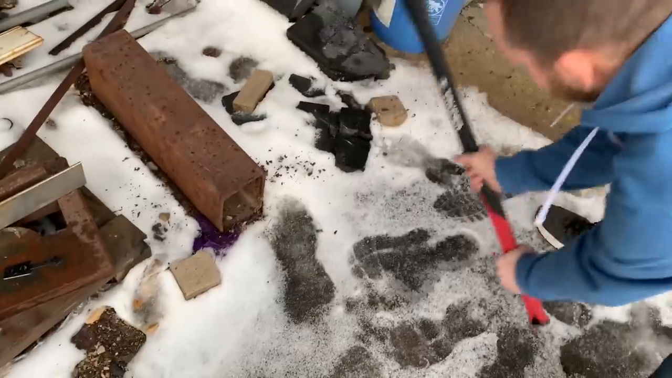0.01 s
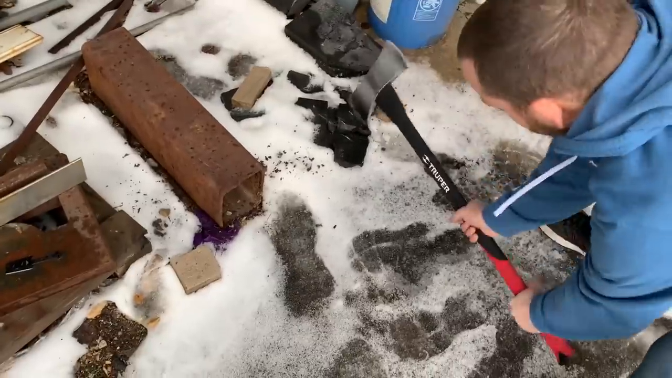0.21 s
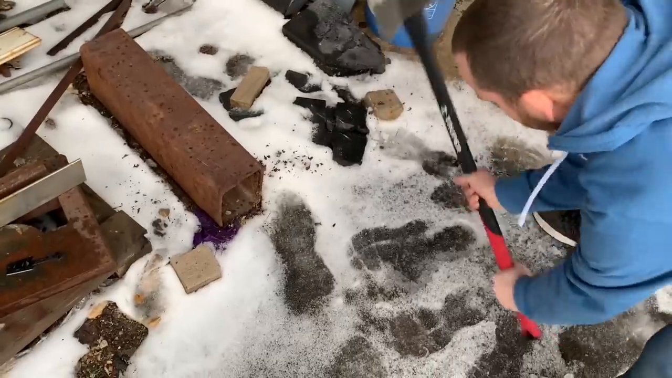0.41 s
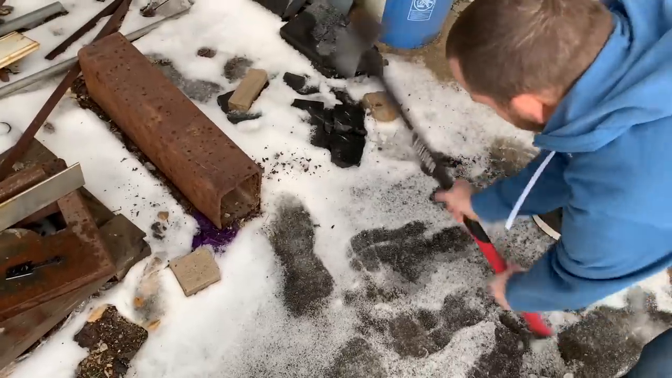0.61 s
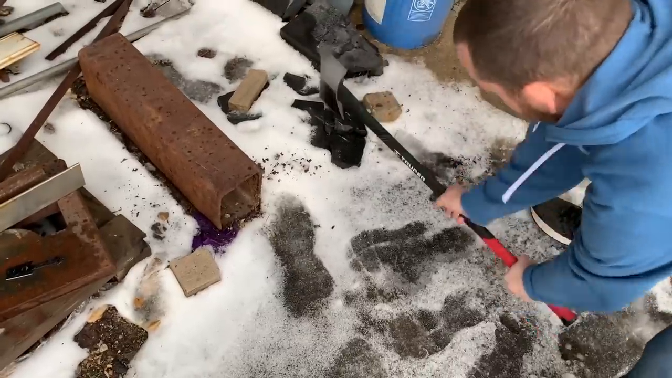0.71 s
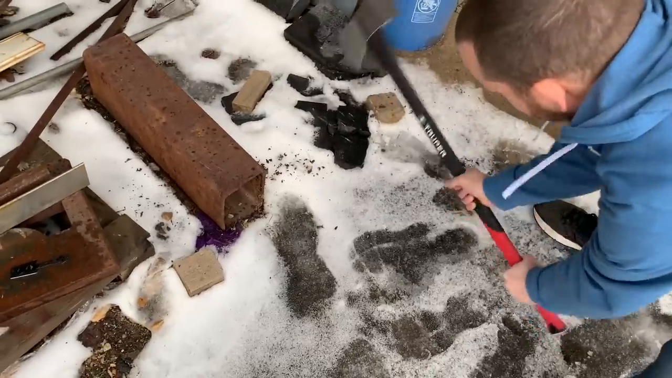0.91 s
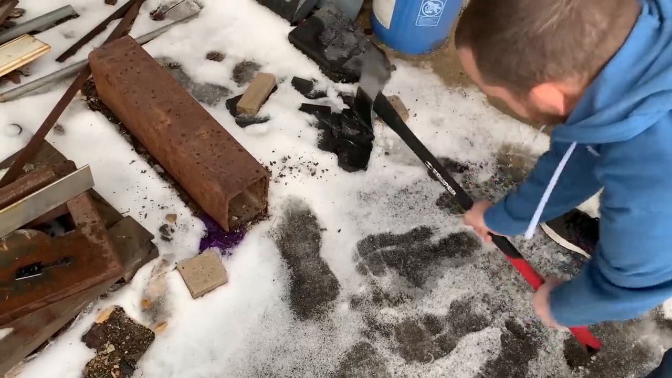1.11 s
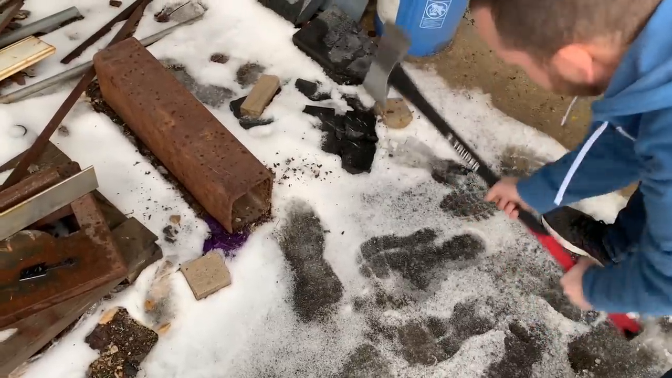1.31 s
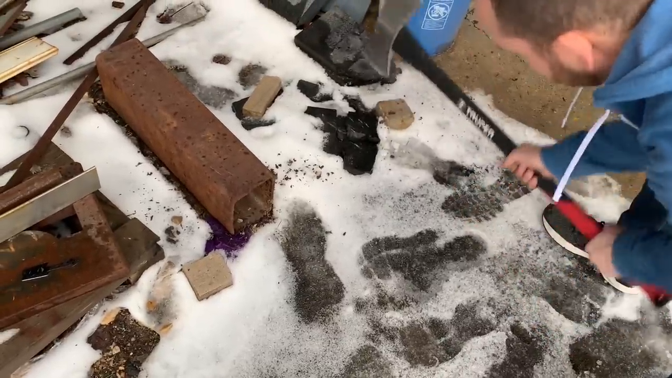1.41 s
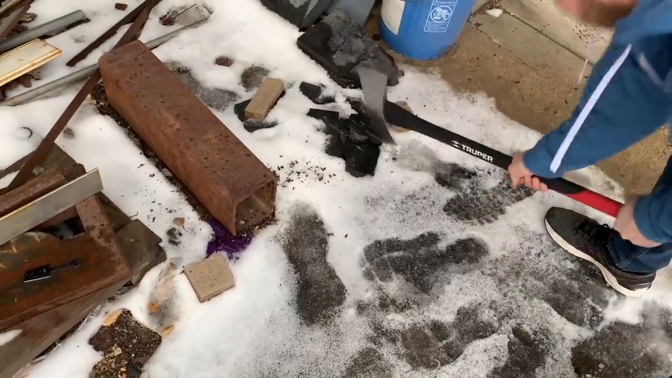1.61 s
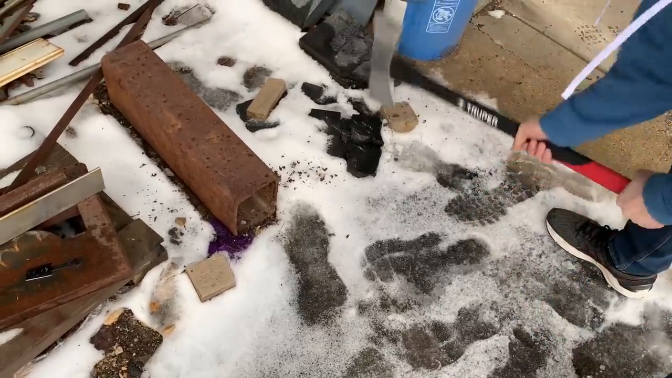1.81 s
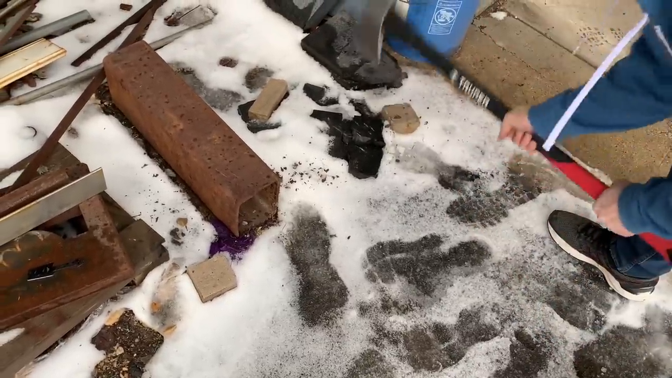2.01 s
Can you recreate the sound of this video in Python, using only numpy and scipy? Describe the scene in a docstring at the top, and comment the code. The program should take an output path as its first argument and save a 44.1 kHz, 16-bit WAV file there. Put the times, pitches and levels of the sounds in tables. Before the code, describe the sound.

A steel axe chops a hard rock four times, sharp gritty cracks with short metallic rings outdoors

```python
"""A steel axe chops four times at a rock in a snowy yard, close by.
A low outdoor rumble, shaped noise with a faint hum, lies underneath; a tick of grit comes first.
Each blow is then a gritty crack (noise bursts), a thud of rock and haft and a ring of the blade
(decaying modes); walls slap it back, a short tail follows and the ground rumbles (shaped noise).
Uneven noise scuffs icy grit twice before the second blow; faint ticks precede the third and fourth."""
import sys
import numpy as np
from scipy import signal
from scipy.fft import rfft, irfft
from scipy.io import wavfile

SR = 44100
rng = np.random.default_rng(int(sys.argv[2]) if len(sys.argv) > 2 else 0)


def materialize(psi):
    """Save the field psi as 16-bit PCM at rate SR to the path in sys.argv[1].

    A 1-D psi becomes a single channel; in a 2-D psi each row is a channel.
    """
    bounded = np.clip(np.atleast_2d(psi).T, -1, 1)
    quanta = np.round(bounded * 32767).astype(np.int16)
    wavfile.write(sys.argv[1], SR, quanta)


N = 90405
TIME = np.arange(N) / SR


def from_db(db):
    """Level to amplitude: 20 dB is a factor of ten."""
    return 10 ** (np.asarray(db) / 20)


def rms_one(x):
    """Normalise the mean power to one."""
    return x / np.sqrt(np.mean(x ** 2) + 1e-20)


def at_hz(points, hz):
    """Interpolate a table along logarithmic frequency."""
    f, v = np.transpose(points)
    return np.interp(np.log(hz), np.log(f), v)


def bins(x):
    """Discrete Fourier frequencies of a signal, held at 1 Hz or above."""
    return np.maximum(np.fft.rfftfreq(x.shape[-1], 1 / SR), 1)


def colour(x, db):
    """Linear filtering: each frequency receives its own gain."""
    return irfft(rfft(x) * from_db(db), x.shape[-1])


def low_pass_db(ratio):
    """First-order roll-off: 3 dB down where frequency / corner is one."""
    return -10 * np.log10(1 + ratio ** 2)


def decay(t, t60):
    """Exponential decay: the amplitude falls by 60 dB in t60."""
    return np.exp(-np.log(1000) * t / t60)


def spread(pair, likeness):
    """Interchannel coherence: shared and opposed parts of two unrelated signals set the likeness."""
    c = np.clip(likeness, -.99, .99)
    mid, side = rfft(pair)
    shared = np.sqrt((1 + c) / 2) * mid
    opposed = np.sqrt((1 - c) / 2) * side
    return irfft(shared + opposed * [[1], [-1]], pair.shape[-1])


# coherence of left and right in a diffuse field: (f/Hz, likeness)
LIKENESS = [(60, 1), (140, .9), (300, 0.78), (640, 0.45), (1400, 0.15), (10000, 0.044)]


def diffuse_noise():
    """Diffuse field: white noise, alike in the bass and nearly unrelated in the treble."""
    return spread(rng.standard_normal((2, N)), at_hz(LIKENESS, bins(TIME)))


def burst(s, rise, fall, count=3):
    """Impulsive noise: a short stereo burst of unit energy, its spectrum repeatedly evened."""
    t = TIME - s
    shape = np.exp(np.minimum(t / rise, -t / fall).clip(-60, 0))
    x = rng.standard_normal((2, N)) * shape
    for _ in range(count):
        even = irfft(np.exp(1j * np.angle(rfft(x))), N)
        x = even * shape ** .25  # gather it again around its moment
    return rms_one(x) / np.sqrt(N)


CRACK_LIKENESS = 0.57  # least likeness of left and right for near sounds
PORT_LAG_S = 4.5e-5  # near sounds reach the left microphone first
# interchannel level difference of near sounds: (f/Hz, left minus right level/dB)
NEAR_PAN = [(200, -31), (500, 18), (1100, -1), (2300, 3), (4500, -7), (12000, 3)]


def near(pair):
    """Interchannel cues: level and time differences place a near sound, slightly early on the left."""
    hz = bins(TIME)
    pair = spread(pair, np.maximum(CRACK_LIKENESS, at_hz(LIKENESS, hz)))
    half_level = np.log(from_db(at_hz(NEAR_PAN, hz))) / 2
    half_lag = 1j * np.pi * hz * PORT_LAG_S
    return irfft(rfft(pair) * np.exp((half_level + half_lag) * [[1], [-1]]), N)


AIR_DB = -42.5  # rms level
# spectrum of the outdoor rumble, relative: (f/Hz, level per Hz/dB)
AIR = [(20, -4), (45, -7.5), (95, -4.5), (130, -9), (200, -16.5), (500, -26), (900, -24), (1300, -31.5),
       (2600, -34.5), (3700, -41.5), (5000, -44), (9000, -55), (15000, -69)]
# sinusoids of the faint distant hum: (f/Hz, level/dB)
HUM = [(92, -55), (904, -65)]


def background():
    """Stationary noise: a low outdoor rumble, with steady sinusoids as a faint hum."""
    air = from_db(AIR_DB) * rms_one(colour(diffuse_noise(), at_hz(AIR, bins(TIME))))
    hum = sum(from_db(db) * np.sin(2 * np.pi * (hz * TIME + rng.random())) for hz, db in HUM)
    return air + hum


TICK_FALL_S = 0.0029  # nominal, before the burst is evened
TICK_SLOPE_DB = 9  # per octave away from the pitch
# small ticks of grit: (t/s, level/dB, pitch f/Hz)
TICKS = [(0.1203, -2, 1280), (1.147, -27, 2400), (1.624, -34.5, 9000)]


def ticks():
    """Band-limited impulses: tiny knocks, each strongest around its own pitch."""
    hz, out = bins(TIME), 0
    for s, db, pitch in TICKS:
        peak_db = db - TICK_SLOPE_DB * abs(np.log2(hz / pitch))
        out = out + colour(burst(s, TICK_FALL_S / 2, TICK_FALL_S), peak_db)
    return near(out)


DULL_RISE_S, DULL_FALL_S, DULL_HZ = 0.00497, 0.00248, 7500  # the duller burst of the crack, nominal
SNAP_DB, SNAP_S = -1.5, 0.0007


def crack_bursts(s):
    """Superposed impulsive noise: a duller, longer burst and a brief bright snap make the crack."""
    roll_off_db = low_pass_db((bins(TIME) / DULL_HZ) ** 2)
    dull = colour(burst(s, DULL_RISE_S, DULL_FALL_S), roll_off_db)
    return dull + from_db(SNAP_DB) * burst(s, SNAP_S, 2 * SNAP_S)


def ring(modes, s):
    """Modal superposition: decaying sinusoids struck at time s, their strengths varying a little."""
    t, out = np.maximum(TIME - s, 0), 0
    for hz, db, t60 in modes:
        strength_db = db + .5 * rng.normal()
        out = out + from_db(strength_db - 60 * t / t60) * np.sin(2 * np.pi * hz * t)
    return out


# mode frequencies of the rock's knock: (f/Hz)
KNOCK_HZ = [545, 658, 1098]
# strength of those modes: (level/dB, t60/s)
KNOCK_MODES = [(-17.5, 0.035), (-22.5, 0.098), (-29.5, 0.022)]


def knock(s):
    """Modal response of the rock: a few short middle-frequency modes."""
    return ring(np.column_stack([KNOCK_HZ, KNOCK_MODES]), s)


# low modes of haft and ground: (f/Hz, t60/s)
THUMP_MODES = [(93, .3), (150, .22), (192, .2), (262, .1)]
# level of each of those modes: (level/dB)
THUMP_LEVELS_DB = [-30.5, -39.5, -35, -22.5]


def thump(s):
    """Low-frequency modal response of haft and ground, nearly alike in every blow."""
    return ring([(hz, db, t60) for (hz, t60), db in zip(THUMP_MODES, THUMP_LEVELS_DB)], s)


BLADE_BLUR = .002  # width of each mode as a share of its frequency
# modes of the steel head: (f/Hz, t60/s)
BLADE_MODES = [(1835, .3), (2022, .2), (2615, .2), (2781, .32), (2842, .3), (3012, .18), (4655, .4),
               (5190, .18), (6245, .4), (6335, .2), (9700, .12), (10590, .1)]
# level of each of those modes: (level/dB)
BLADE_LEVELS_DB = [-42.5, -40.5, -26.5, -27.5, -40.5, -41, -39, -47.5, -35, -44.5, -52, -40]


def blade(s, tilt_db):
    """Modes with phase diffusion: the steel rings unsteadily, out of step at the two microphones."""
    t, out = np.maximum(TIME - s, 0), 0
    middle_hz = np.median([hz for hz, _ in BLADE_MODES])
    for (hz, t60), db in zip(BLADE_MODES, BLADE_LEVELS_DB):
        strength_db = db + tilt_db * np.log2(hz / middle_hz) + rng.normal()
        level = from_db(strength_db) * decay(t, t60)
        wander = np.cumsum(rng.standard_normal(N)) * np.sqrt(2 * np.pi * BLADE_BLUR * hz / SR)
        offset = rng.uniform(-1, 1) * np.array([[1], [-1]])
        out = out + level * np.sin(2 * np.pi * hz * t + wander + offset)
    return out * (TIME > s)


CRACK_DB, THUD_LAG_S, BLADE_DIRECT_DB = 12.5, 0.00149, -2
CLINK_OCTAVES = 0.054  # distance from the pitch at which a clink's dB are halved
CRACK_SEND_DB, CLINK_SEND_SHARE, SEND_DULL_HZ = 2.5, 0.62, 11000  # the crack sent into the yard
BLADE_SEND_DB, BODY_SEND_DB = -1, -9
# blows: (t/s, crack level/dB, knock level/dB, blade level/dB, blade tilt/dB per octave, yard level/dB)
BLOWS = [(0.2095, 2.5, -6, 3.5, -5, 0), (0.738, 1.5, 3.5, -5, 6.5, 1), (1.1957, 0.5, 3, -3, 7, 0.5),
         (1.6675, 5.5, 4, -8.5, -0.5, -4)]
# frequencies at which the crack varies from blow to blow: (f/Hz)
TONE_HZ = [600, 1200, 2200, 4800, 10000]
# the edge meets the rock differently, one row a blow: (level/dB at each of TONE_HZ)
BLOW_TONES = [(-14.5, -4.5, 5, -5, 1), (1, -2, -2.5, 5, 0.61), (-4.5, -3.5, 1.5, 3, 0.87),
              (1.5, -4, -3, 2, -2.7)]
# spectrum of the crack, relative: (f/Hz, level per Hz/dB)
CRACK = [(60, -12), (200, -3), (600, -0.5), (1400, 4.5), (2200, 2), (3200, 3), (4100, -5), (6200, -6),
         (7600, -6), (9600, 0.5), (11000, -10), (12300, -11), (14500, -5), (16000, -57)]
# short clinks of the stone, two a blow: (f/Hz, level/dB, f/Hz, level/dB)
CLINKS = [(2630, 14.5, 6560, 17.5), (1050, 9.5, 6050, 8.5), (1920, 7, 6530, 17), (2327, 8.5, 5000, 2.5)]


def axe():
    """Impact excitation: the blows as heard directly, and what they send into the yard."""
    cracks, rings, sent, hz = 0, 0, 0, bins(TIME)
    for blow, tone, clinks in zip(BLOWS, BLOW_TONES, CLINKS):
        s, crack_db, knock_db, ring_db, tilt_db, yard_db = blow
        clink_db = 0
        for pitch, peak_db in zip(clinks[::2], clinks[1::2]):
            clink_db = clink_db + peak_db / (1 + (np.log2(hz / pitch) / CLINK_OCTAVES) ** 2)
        stone_db = crack_db + CRACK_DB + at_hz(CRACK, hz) + at_hz(list(zip(TONE_HZ, tone)), hz)
        body = from_db(knock_db) * knock(s + THUD_LAG_S) + thump(s + THUD_LAG_S)
        steel = from_db(ring_db) * blade(s, tilt_db)
        cracks = cracks + colour(crack_bursts(s), stone_db + clink_db)
        rings = rings + body + from_db(BLADE_DIRECT_DB) * steel
        # the yard receives a brief, duller crack with weaker clinks
        send_db = CRACK_SEND_DB + stone_db + CLINK_SEND_SHARE * clink_db
        send_db = send_db + low_pass_db(hz / SEND_DULL_HZ)
        crack_send = colour(burst(s, SNAP_S, 2 * SNAP_S, count=5)[0], send_db)
        thud_and_ring = from_db(BODY_SEND_DB) * body + from_db(BLADE_SEND_DB) * steel[0]
        sent = sent + from_db(yard_db) * (crack_send + thud_and_ring)
    return near(cracks) + rings, sent


ECHO_DULL_HZ = 6000
SLAP_S, SLAP_WIDTH_S, SLAP_DB = 0.026, .0045, -32.5
TAIL_START_S, TAIL_DB = 0.014, -33.5
EARLY_SCATTER_DB = -13  # of the tail before its start
# nominal delays of the wall echoes: (t/s)
ECHO_S = [.0175, .0235, .0265, .049, .072]
# those echoes before the yard's colour: (level/dB, left minus right level/dB)
ECHOES = [(-17.5, -9), (-8, 0.34), (-17.5, 4.8), (-26.5, 6), (-19, 6.8)]
# gain of the whole yard response: (f/Hz, level/dB)
YARD_COLOUR = [(80, 6.5), (250, 6.5), (600, 5), (1200, 5.5), (2500, 1.5), (5000, 5), (7500, -4), (10000, 3),
               (12000, -14), (15000, 2)]
# reverberation time of the tail: (f/Hz, t60/s)
YARD_T60 = [(80, 0.76), (300, 0.62), (1000, 0.48), (2500, .52), (5000, .44), (9000, 0.34), (14000, 0.41)]


def yard_response():
    """Impulse response: wall echoes, a scattered slap and a tail whose decay depends on frequency."""
    hz = bins(TIME)
    slap_shape = np.exp(-.5 * ((TIME - SLAP_S) / SLAP_WIDTH_S) ** 2)
    out = diffuse_noise() * from_db(SLAP_DB) * slap_shape
    opening = np.where(TIME < TAIL_START_S, from_db(EARLY_SCATTER_DB), 1)
    tail = rfft(diffuse_noise())
    centres = np.geomspace(60, 15000, 12)  # overlapping bands, each with its own decay
    for centre, band in zip(centres, np.eye(len(centres))):
        band_noise = irfft(tail * np.interp(np.log(hz), np.log(centres), band), N)
        out += band_noise * from_db(TAIL_DB) * opening * decay(TIME, at_hz(YARD_T60, centre))
    echoes = np.zeros((2, N))
    for s, (db, pan_db) in zip(ECHO_S, ECHOES):
        for side, sign in enumerate((1, -1)):
            arrival = int(s * SR) + rng.integers(0, 10)  # up to nine samples late
            echoes[side, arrival] += from_db(db + sign * pan_db / 2)
    out += colour(echoes, low_pass_db(hz / ECHO_DULL_HZ))
    return colour(out, at_hz(YARD_COLOUR, hz))


RUMBLE_DB, RUMBLE_HZ, RUMBLE_RISE_S, RUMBLE_T60 = -22.5, 150, 0.0089, 0.51
RUMBLE_SLOPE_DB = 2  # times the square of the octaves from RUMBLE_HZ


def ground():
    """Build-up and decay: low noise swells and dies after each blow."""
    level = 0
    for blow in BLOWS:
        age = np.maximum(TIME - blow[0], 0)
        level = level + (1 - np.exp(-age / RUMBLE_RISE_S)) * decay(age, RUMBLE_T60)
    low_db = -RUMBLE_SLOPE_DB * np.log2(bins(TIME) / RUMBLE_HZ) ** 2
    return from_db(RUMBLE_DB) * level * rms_one(colour(diffuse_noise(), low_db))


SCUFF_CATCH_S, SCUFF_CATCH_DB = .0015, 3  # spacing and spread of the catches
SCUFF_GRAIN_DB, SCUFF_EDGE_S = 5, .003
# scuffs: (start t/s, length t/s, level/dB, tilt/dB per octave)
SCUFFS = [(0.562, .02, -35, 0), (0.639, .039, -35.5, 2.5)]
# spectrum of a scuff, relative: (f/Hz, level/dB)
SCUFF = [(200, -11), (900, -17.5), (1500, -5.5), (2200, -8.5), (3300, -6.5), (5500, -14.5), (7200, -13),
         (9000, -4), (11500, -16), (14000, -8.5), (16000, -32)]


def scuffs():
    """Sliding friction: short gritty noise that catches unevenly and fades quickly."""
    out, hz, catches = 0, bins(TIME), np.arange(0, N / SR, SCUFF_CATCH_S)
    for s, length, db, tilt_db in SCUFFS:
        grip_db = SCUFF_CATCH_DB * np.interp(TIME, catches, rng.standard_normal(len(catches)))
        grain_db = SCUFF_GRAIN_DB * rng.standard_normal(N)
        grit = rng.standard_normal((2, N)) * from_db(grip_db + grain_db)
        slide = rms_one(colour(grit, at_hz(SCUFF, hz) + tilt_db * np.log2(hz)))
        outside = np.maximum(np.maximum(s - TIME, TIME - s - length), 0)
        out = out + from_db(db) * np.exp(-outside / SCUFF_EDGE_S) * slide
    return near(out)


TICK_YARD_DB, SCUFF_YARD_DB = -14, -8.5


def scene():
    """Superposition: direct sounds, their convolution with the yard, and the background."""
    blows, sent = axe()
    scuff, tick = scuffs(), ticks()
    sent = sent + from_db(SCUFF_YARD_DB) * scuff[0] + from_db(TICK_YARD_DB) * tick[0]
    yard = signal.fftconvolve(sent[None], yard_response(), axes=1)[:, :N]
    yard = yard * from_db([[.3], [-.3]])  # raised a little on the left, lowered on the right
    return background() + tick + blows + yard + ground() + scuff


LOW_CUT_HZ = 34
CUTOFF_HZ = 16800  # from here up the treble is 70 dB down


def record(dry):
    """Band-limiting and saturation: deep bass is lost, peaks are rounded and the top is cut."""
    dry = signal.sosfilt(signal.butter(2, LOW_CUT_HZ, "high", fs=SR, output="sos"), dry)
    rounded = .95 * dry / (1 + dry ** 4) ** (1 / 4)
    return signal.sosfilt(signal.cheby2(16, 70, CUTOFF_HZ, fs=SR, output="sos"), rounded)


dry = scene()
out = record(dry)
materialize(out)
```